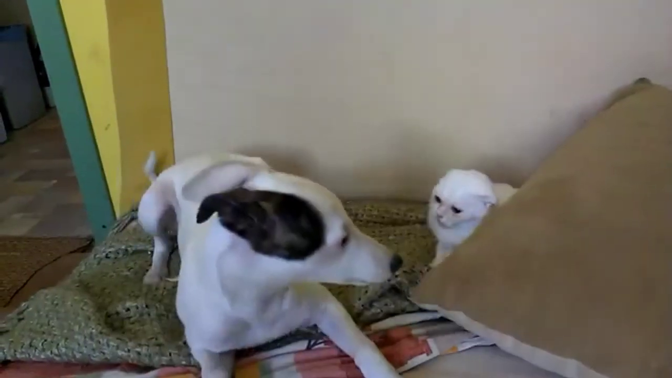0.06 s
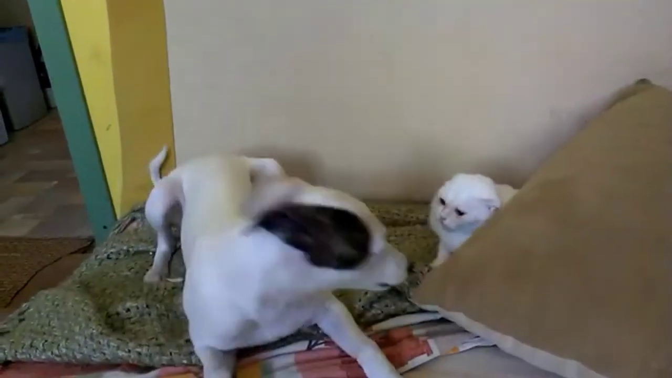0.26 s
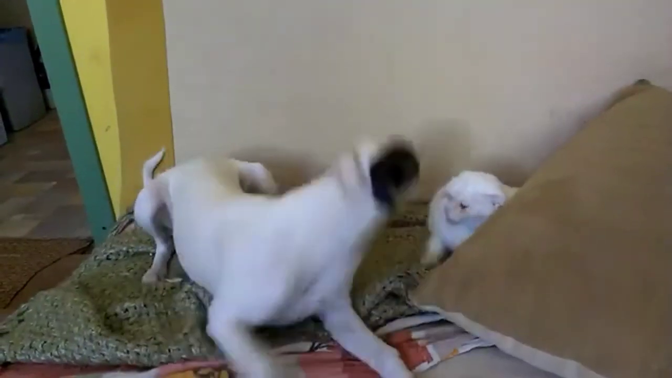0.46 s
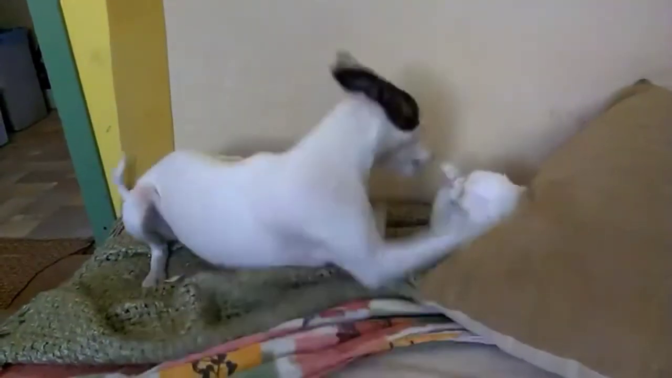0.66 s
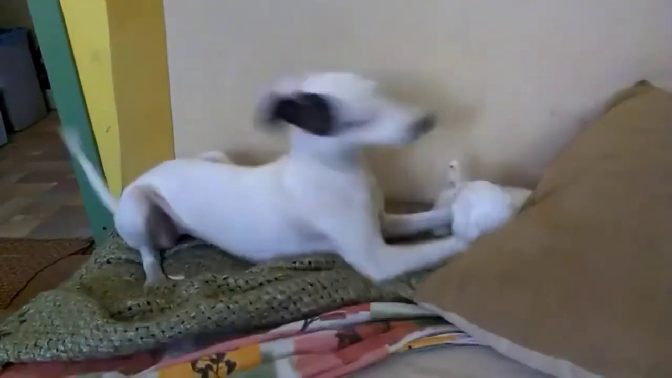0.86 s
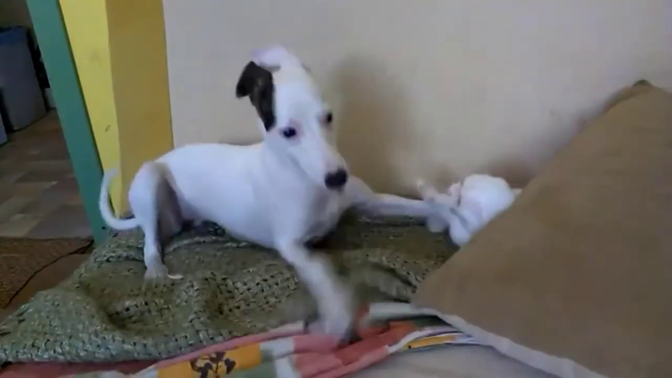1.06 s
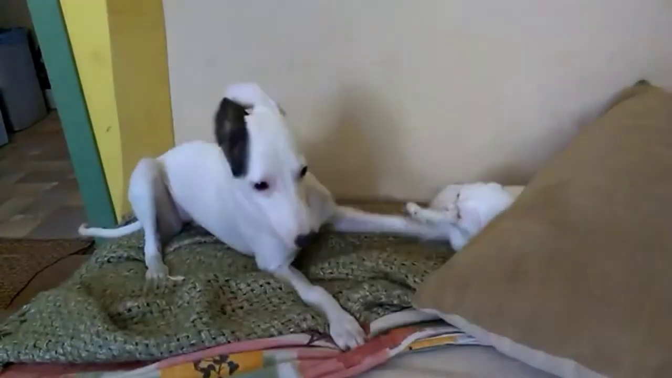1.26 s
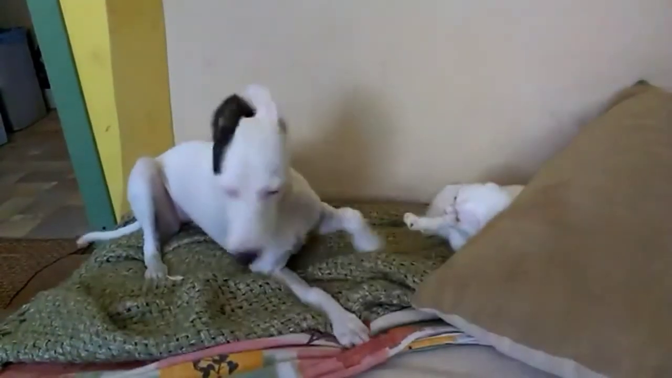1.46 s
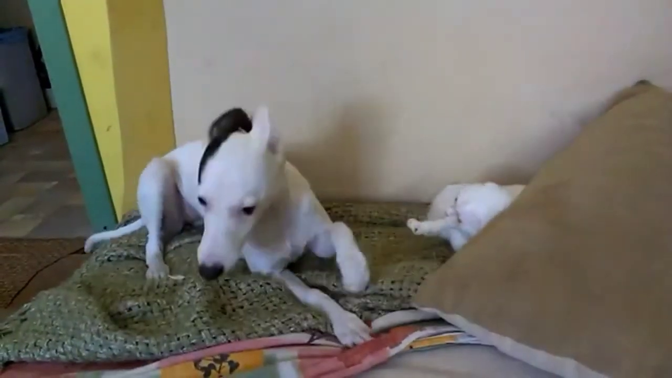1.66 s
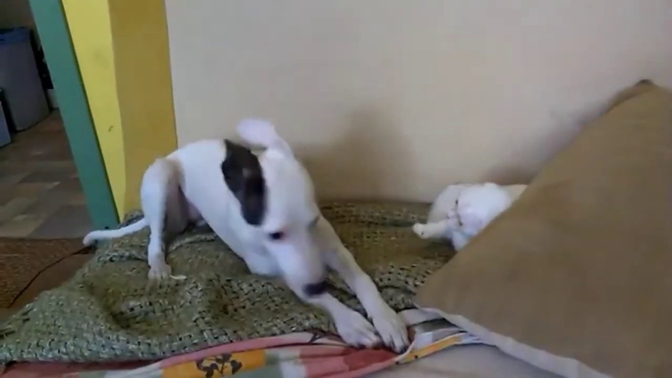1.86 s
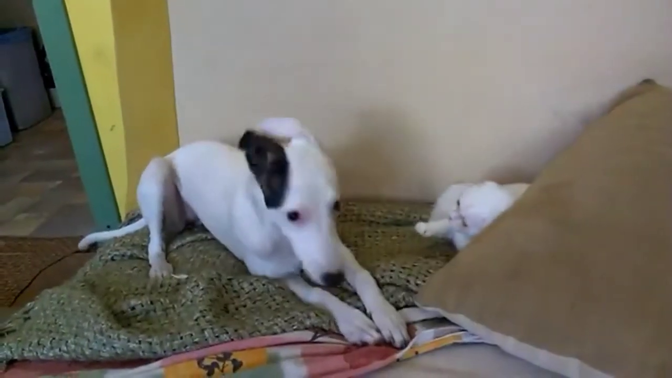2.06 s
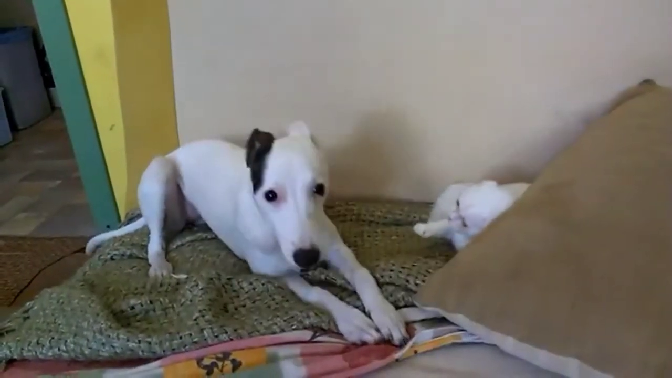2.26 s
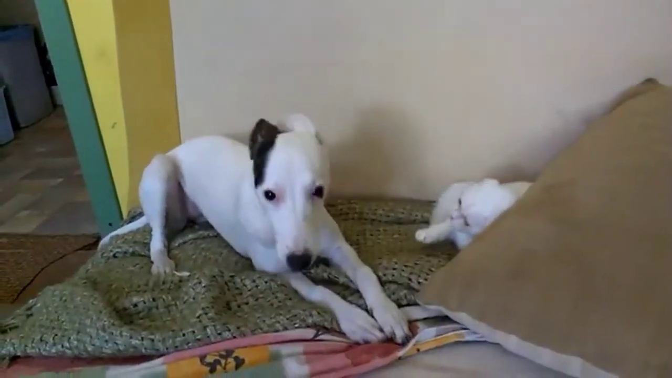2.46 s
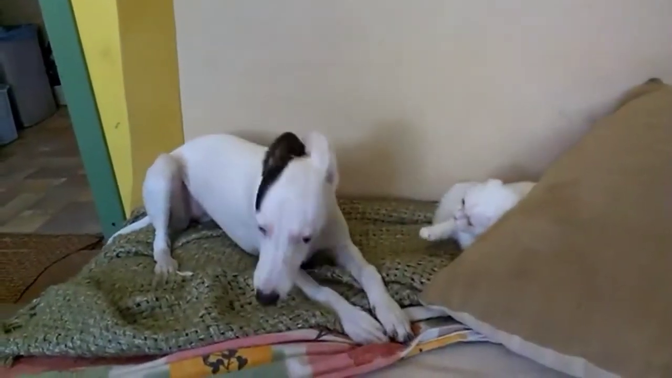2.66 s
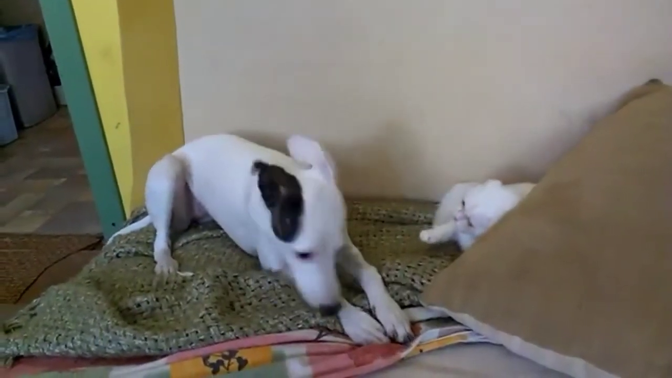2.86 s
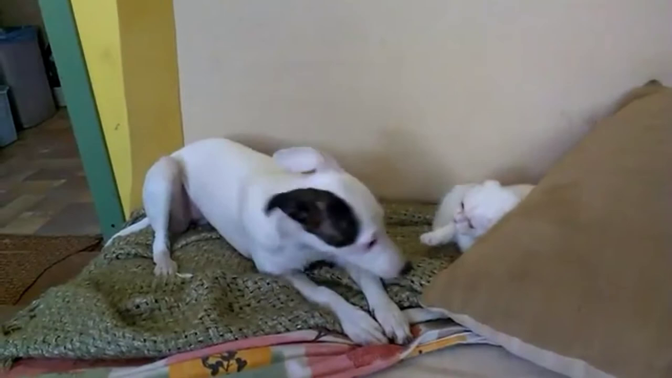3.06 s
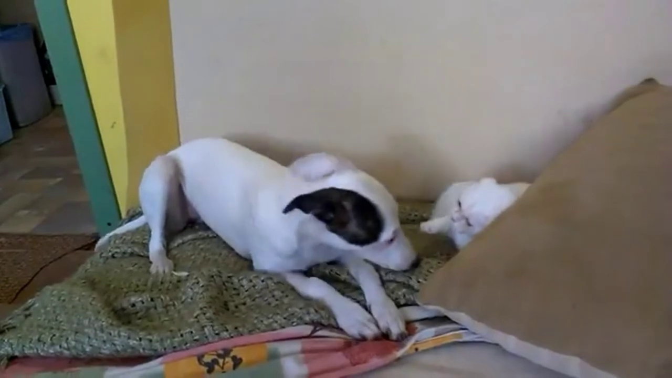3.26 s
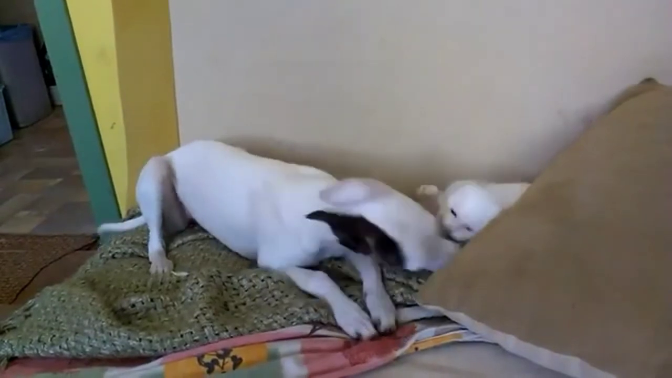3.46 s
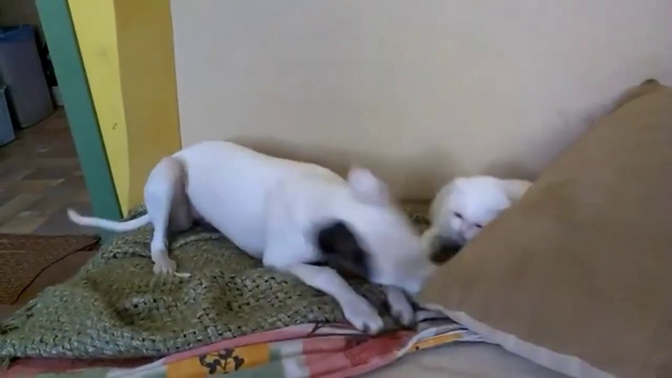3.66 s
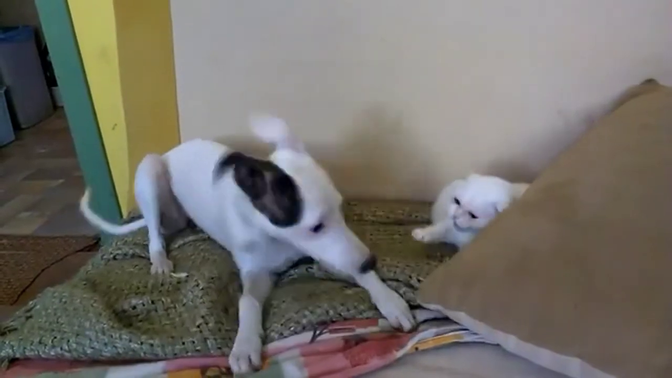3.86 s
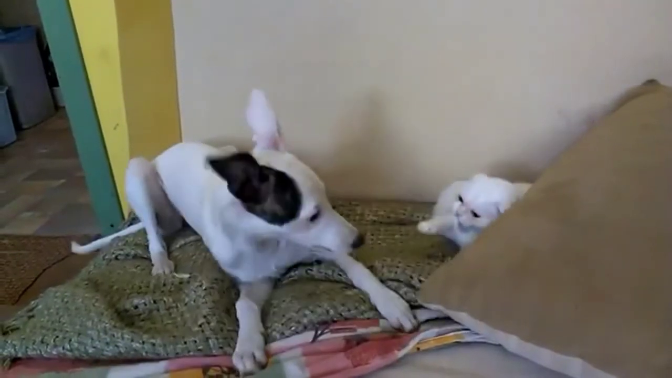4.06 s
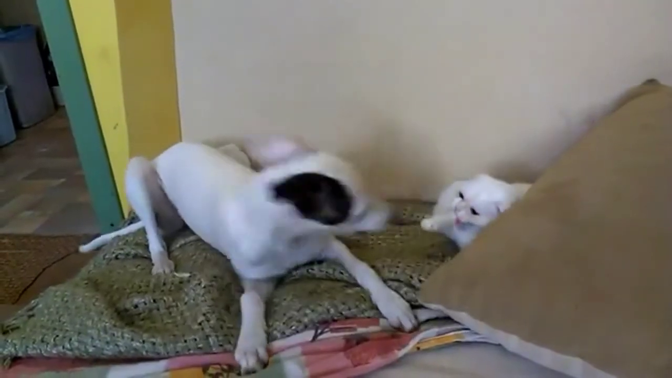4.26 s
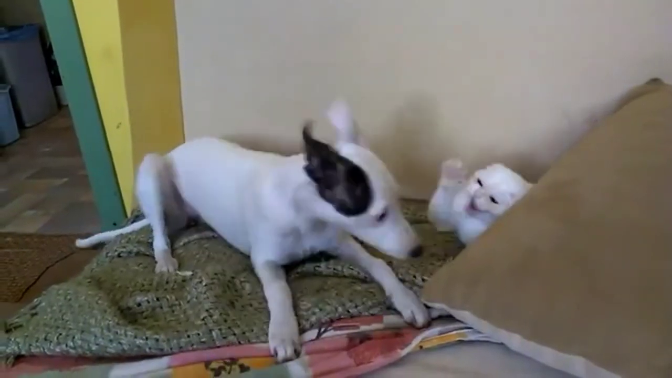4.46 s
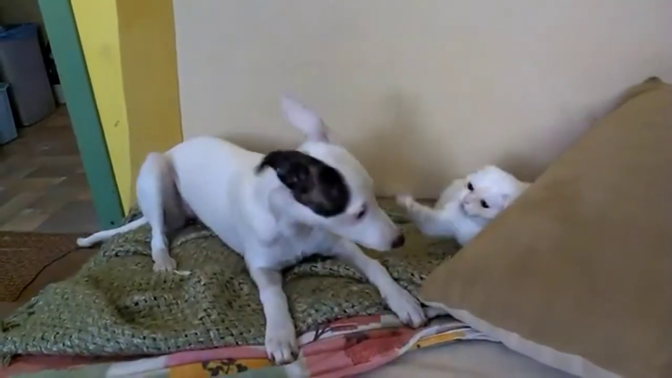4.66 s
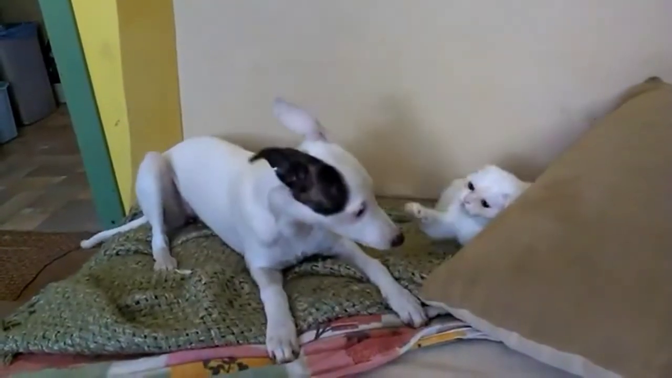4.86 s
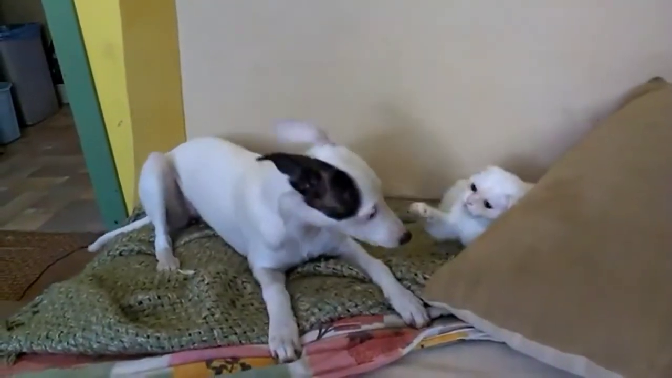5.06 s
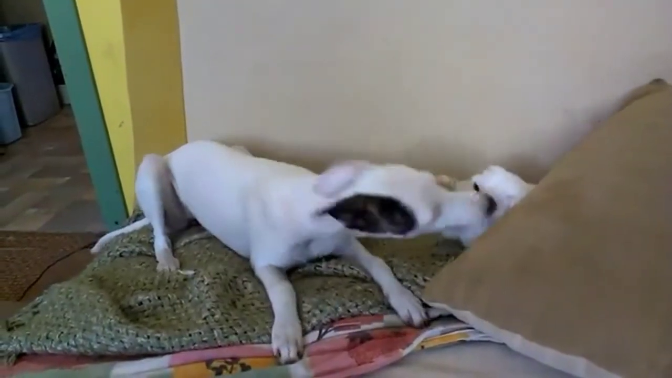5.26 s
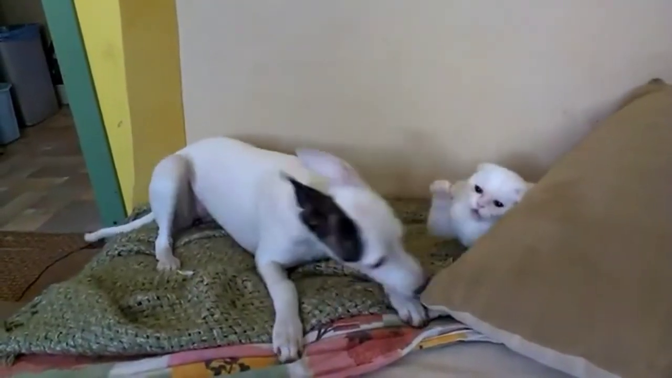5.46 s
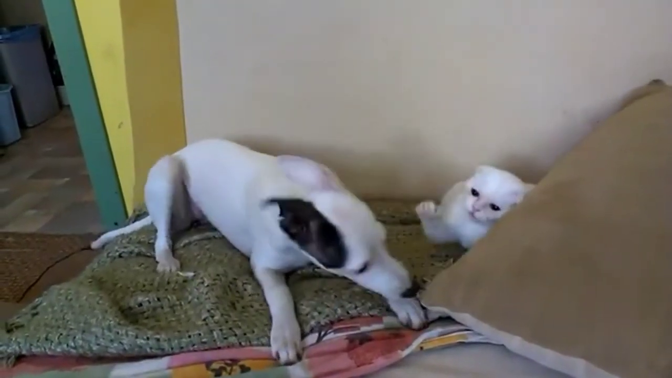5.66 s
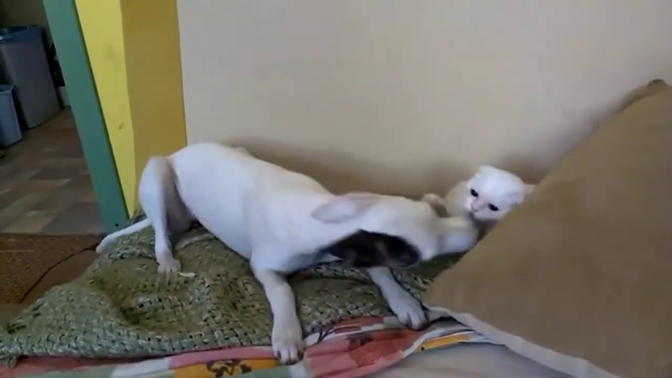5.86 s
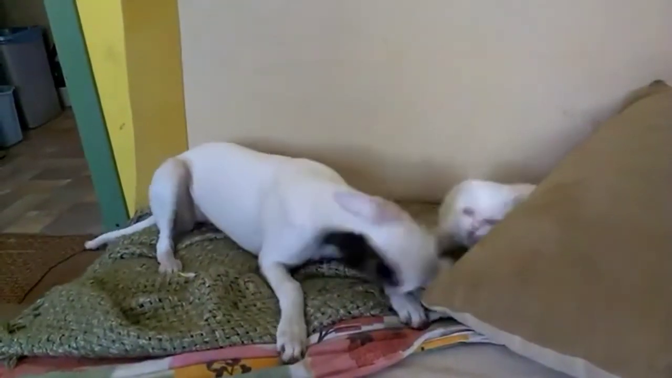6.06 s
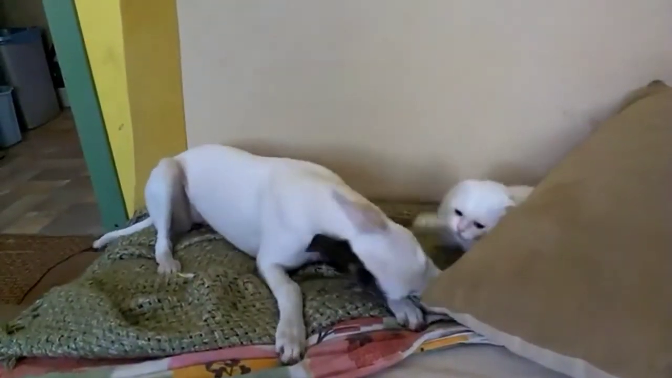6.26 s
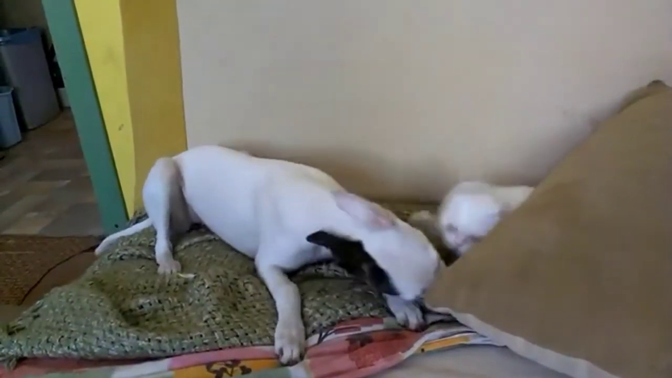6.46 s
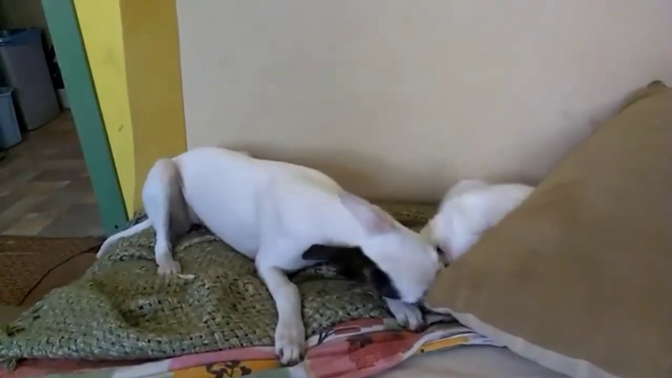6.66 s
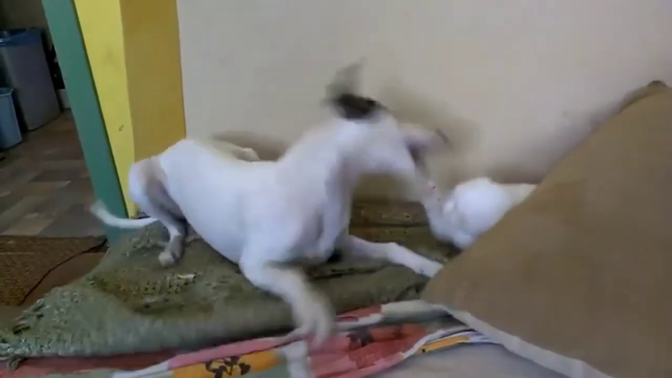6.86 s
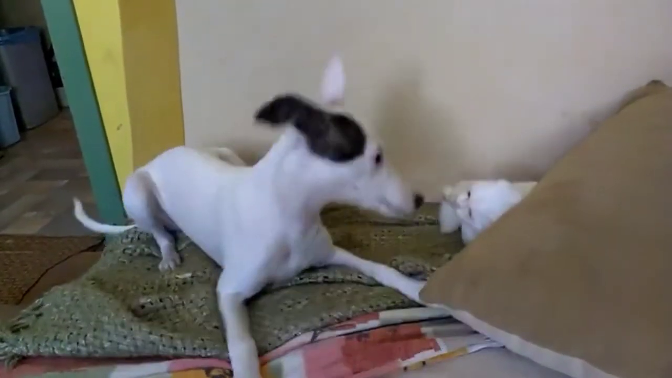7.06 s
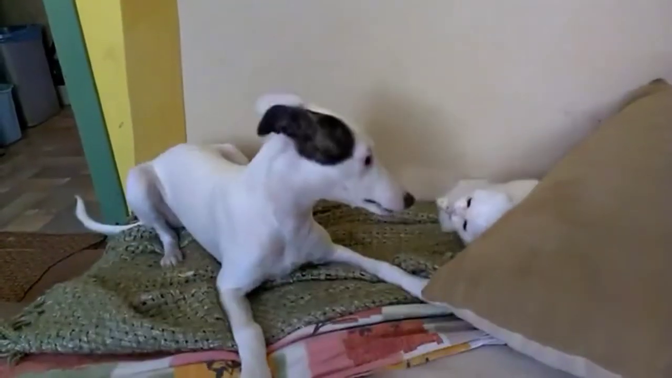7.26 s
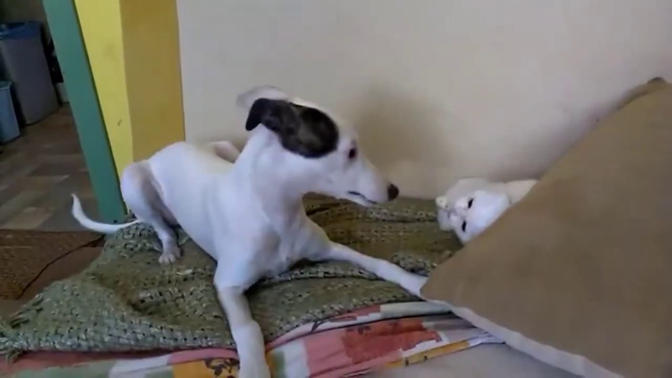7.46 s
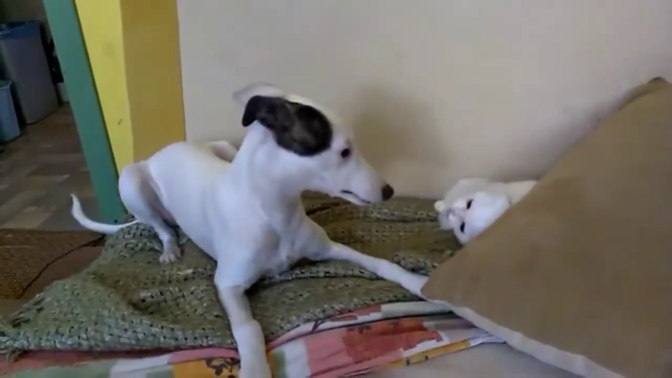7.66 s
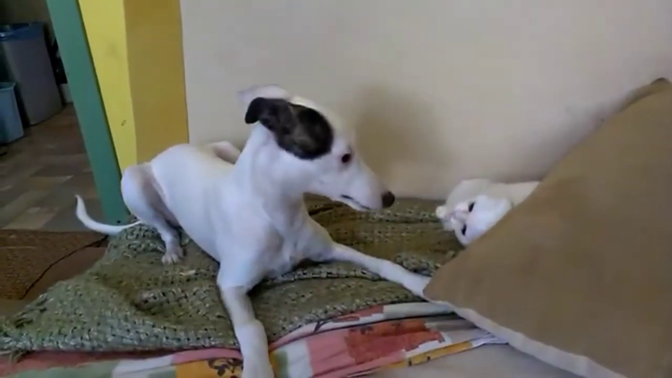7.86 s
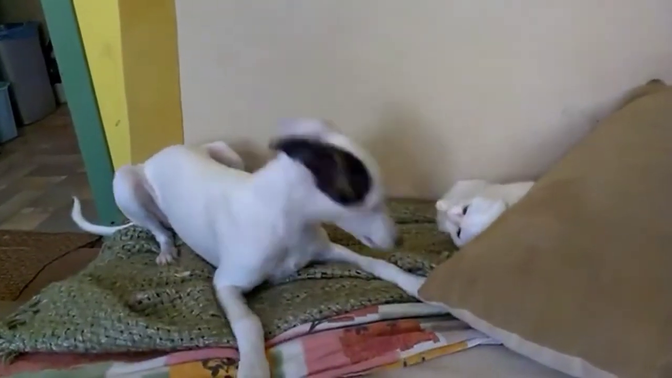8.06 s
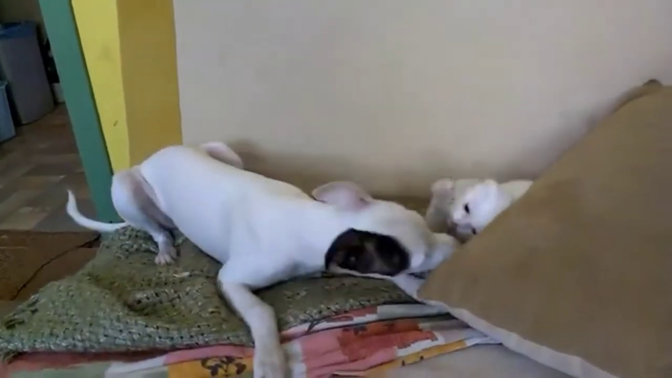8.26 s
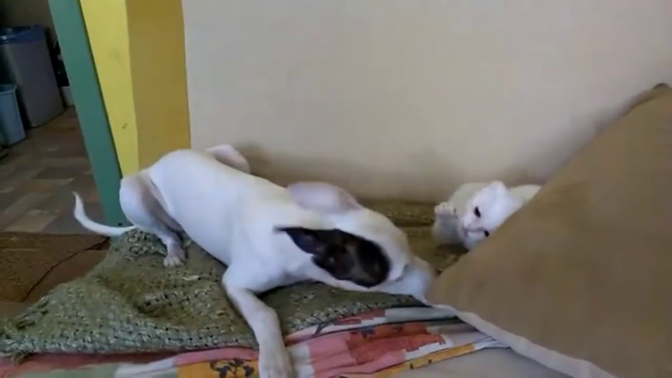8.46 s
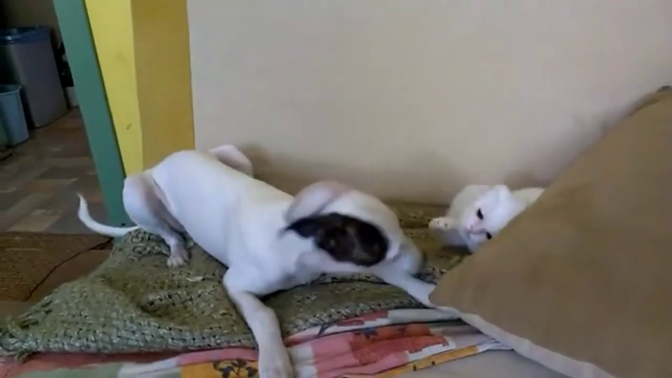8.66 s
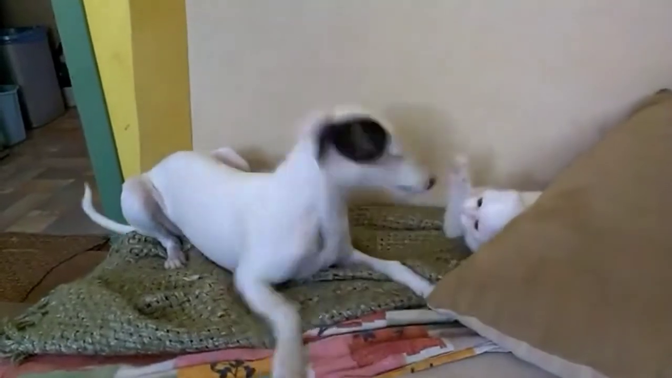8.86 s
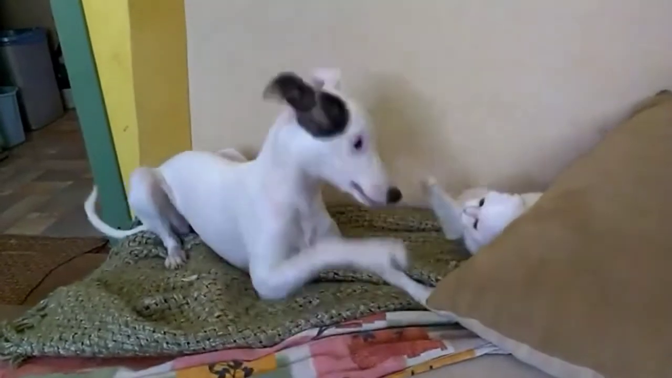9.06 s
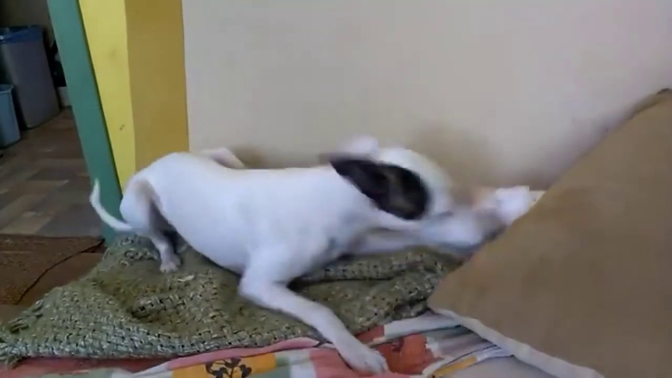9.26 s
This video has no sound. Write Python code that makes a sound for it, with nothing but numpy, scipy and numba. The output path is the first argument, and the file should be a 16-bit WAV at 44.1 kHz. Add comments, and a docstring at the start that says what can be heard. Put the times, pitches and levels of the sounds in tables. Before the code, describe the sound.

Close to the microphone in a small room, a kitten wards off a dog with repeated bursts of rough growling. The first two growls open into yowls, followed by a breathy hiss. Then a stuttering snarl climbs into several sharp spits and a falling cry, and one more growl follows. The dog is heard through soft paw thumps, rustling bedding and light clicks of claws and lips.

```python
"""A kitten's rattling growl opens into yowls, a hiss and a spitting screech as it wards off a playful dog.
Its vocal folds rattle when slack and run clean when taut, ringing chest and mouth; forced air makes the
hiss and screech, the tensed throat thin squeaks. The dog's paws thump on the bedding, the cloth rustles,
claws and lips tick. One microphone, close to the blanket where the kitten is cornered in a small
plastered room, with a wall just behind the animals."""
import sys
import numpy as np
from scipy import signal
from scipy.fft import rfft, irfft
from scipy.io import wavfile
from scipy.ndimage import uniform_filter1d
from numba import njit

SR = 44100
rng = np.random.default_rng(int(sys.argv[2]) if len(sys.argv) > 2 else 0)


def bounce(signal):
    """Save signal as a 16-bit WAV file at the path given by the first command-line argument."""
    frames = np.transpose(np.atleast_2d(signal))
    limited = np.clip(frames, -1, 1)
    pcm = np.round(limited * 32767).astype(np.int16)
    wavfile.write(sys.argv[1], SR, pcm)


N = 411012
TIME = np.arange(N) / SR

# the kitten's voice, one curve a phrase: (time [s], pitch [Hz], mouth opening [0-1], effort [dB])
VOICE_PHRASES = [
    [(0, 142, 0.32, -47), (.45, 144.3, 0.38, -52), (.76, 157.6, 0.5, -50), (.86, 315.5, 0.75, -49),
     (.915, 352, 0.84, -53.5), (.935, 456.6, 0.88, -51), (1.08, 560, 0.96, -55), (1.17, 470.7, 0.86, -51),
     (1.22, 318.7, 0.83, -43.5), (1.28, 164.9, .68, -49), (1.38, 143.1, 0.48, -45.5),
     (1.62, 137.8, 0.03, -50.5)],
    [(2.68, 112.2, 0.05, -57), (3.2, 115.5, 0.02, -53), (3.4, 140.2, 0.08, -53), (3.44, 220, 0.03, -44),
     (3.5, 259.2, 0.03, -48.5), (3.58, 301, 0.05, -51.5)],
    [(3.707, 236.8, 0.63, -45), (3.75, 302.1, .88, -48.5), (3.8, 406.4, 0.84, -47.5),
     (3.83, 360.5, 1, -46.5), (3.853, 279.4, 0.75, -43.5), (3.872, 206.1, 0.67, -49.5)],
    [(5.64, 118.2, 0.02, -58.5), (5.95, 135.9, 0.07, -50.5), (6.03, 173.9, 0.59, -52.5),
     (6.24, 239, 0.5, -50.5), (6.5, 187.6, 0.66, -50), (6.64, 269.8, 0.77, -52), (6.73, 349.8, 0.84, -50),
     (6.765, 445.7, .94, -51.5), (6.865, 329.8, 0.71, -41.5), (6.93, 444.4, 0.96, -43),
     (6.975, 295.2, 0.66, -44.5)],
    [(7.305, 431, 0.66, -47.5), (7.46, 377.5, 0.56, -45.5), (7.63, 287, .58, -53.5)],
    [(8.338, 169.4, 0.54, -49), (8.55, 165.4, 0.55, -54.5), (8.78, 161.3, 0.13, -52),
     (8.88, 161.2, .56, -51), (9.0, 195, 0.69, -50), (9.12, 162.4, 0.54, -51.5), (9.32, 160.4, 0.06, -51.5)],
]
# widths of the mouth's resonances: (first [Hz], second [Hz], third [Hz], top [Hz])
FORMANT_WIDTHS = [344, 680, 811, 1260]
# air forced through the tight throat:
# (time [s], length [s], level [dB], resonance at start [Hz], at end [Hz], release [s])
THROAT_SPITS = [(6.958, .025, -23, 4894, 5600, 0.267), (7.104, .065, -23.5, 5800, 4100, .25),
                (7.263, 0.074, -27.5, 4950, 3843, 0.304), (7.372, 0.063, -24, 5864, 5370, 0.486)]


def voice(throat_air_db=-5, nose_hz=5700, push_throat_share=0.26):
    """Growls stay in the chest; as the mouth opens the upper resonances rise and take over."""
    # the mouth from shut to wide: (opening [0-1], first, second, third and top resonance [Hz],
    # first over chest [dB], third over second [dB], mouth over throat [dB])
    vowels = [(0, 620, 900, 4300, 5600, 1, 19, -26.5), (.2, 712, 1220, 3440, 6200, -6.5, -1, -8),
              (.5, 740, 1880, 4060, 7800, -3.5, 2, 1), (.7, 600, 2600, 4200, 7780, -3.5, -1, 10.5),
              (1, 1500, 2890, 3100, 7600, 2, -7.5, 19.5)]
    # how far the lips are drawn back, one value a phrase: (top resonance [factor])
    lip_factors = [0.85, .85, 0.88, 1.04, .9, 0.975]
    # pushes of breath that swell the open mouth's sound:
    # (time [s], length [s], boost [dB], third resonance [Hz], third over second [dB])
    pushes = [(.96, 0.065, 12.5, 4730, 0.5), (1.08, 0.094, 14.5, 4020, -3.5), (1.125, 0.018, 6, 3550, -1),
              (3.736, 0.055, 7.5, 3780, 1.5), (3.833, 0.021, 4, 3440, -1), (6.14, 0.069, 7.5, 3630, -0.5),
              (6.26, 0.079, 8.5, 4100, -4.5), (6.395, 0.056, 8, 4040, 0), (6.54, .08, 4, 3960, -4),
              (6.699, 0.03, 5.5, 3500, 3), (6.77, 0.049, 7.5, 4374, 5.5), (6.935, 0.019, 15, 4040, 6.5),
              (8.35, 0.031, 1.5, 4070, 3.5)]
    pitch, opening, effort_db = in_time(np.vstack(VOICE_PHRASES))
    openings, *columns = np.transpose(vowels)
    shape = [np.interp(opening, openings, column) for column in columns]
    first_hz, second_hz, third_hz, top_hz, first_db, third_db, open_db = shape
    lips, = in_time([(row[0], factor) for rows, factor in zip(VOICE_PHRASES, lip_factors) for row in rows])
    push_db = 0
    for s, length_s, boost_db, pushed_hz, pushed_db in pushes:
        push_db = push_db + boost_db * bump(s, length_s)
        reshaped = bump(s, 2 * length_s)
        third_hz = third_hz + reshaped * (pushed_hz - third_hz)
        third_db = third_db + reshaped * (pushed_db - third_db)
    throat_db = effort_db + push_throat_share * push_db
    mouth_db = effort_db + open_db + push_db
    closures, puffs = folds(pitch)
    source = closures + puffs
    low = from_db(throat_db) * throat(closures + from_db(throat_air_db) * puffs, opening, first_hz, first_db)
    bright = from_db(mouth_db) * mouth(source, second_hz, third_hz, third_db)
    # the top resonance and a steady nasal one grow more slowly with effort than the others
    top_gain = from_db(-55 + 0.39 * mouth_db) * np.minimum(2 * opening, 1)
    top = top_gain * formant(source, lips * top_hz, FORMANT_WIDTHS[3])
    nose = from_db(-42 + 0.53 * mouth_db) * formant(source, nose_hz, width_hz=1200)
    return voicing() * (low + bright + top + nose)


def folds(pitch, slack_rough=.72, taut_rough=.1, break_hz=228.6, fry_hz=139.2,
          jitter=.06, waver=.014, shimmer=3.0, snap_s=2.6e-5, puff_cycles=.45, air=0.028, rasp=0.39):
    """Sharp closures and the puffs of air after them, uneven when the folds are slack and in a spit."""
    forced = spitting()
    rough = taut_rough + (slack_rough - taut_rough) / (1 + (pitch / break_hz) ** 9)
    rough = np.clip(rough + .4 * forced / forced.max(), 0, 1)
    fry_db = 2 / (1 + (pitch / fry_hz) ** 20)
    pitch = pitch * np.exp(jitter * rough * drift(170) + waver * drift(90))
    # each closure comes a little early or late: low harmonics stay steady, high ones rasp
    phase = np.cumsum(pitch) / SR + (0.005 + .07 * rough) * drift(300)
    cycle = np.abs(np.round(phase)).astype(int)
    shimmer_db = shimmer * np.sqrt(rough) * rng.standard_normal(N // 20)[cycle].clip(-1.6, 1.6)
    doubling_db = (fry_db + 0.95 * drift(25)) * (-1.) ** cycle   # strong and weak cycles alternate
    strength = from_db(shimmer_db + doubling_db)
    closure = np.exp(-.5 * ((phase - cycle) / pitch / snap_s) ** 2)
    puff = np.exp(-(phase % 1) / puff_cycles) * rng.standard_normal(N)
    return strength * closure, strength * (air + rasp * rough) * puff


def throat(source, opening, first_hz, first_db, bass_hz=180, muffle_hz=820, shut_below=0.15):
    """Chest and first resonance, muffled when the mouth is shut; the deepest bass is thin."""
    # chest and pharynx resonances: (centre [Hz], width [Hz], level [dB])
    cavities = [(204.5, 58, -1), (284.3, 103, 4), (499, 310, 2)]
    chest = evened(sum(from_db(db) * formant(source, hz, width) for hz, width, db in cavities))
    sound = chest + from_db(first_db) * formant(source, first_hz, FORMANT_WIDTHS[0])
    sound = signal.sosfilt(signal.butter(4, bass_hz, "high", fs=SR, output="sos"), sound)
    muffled = signal.sosfiltfilt(signal.butter(3, muffle_hz, fs=SR, output="sos"), sound)
    return evened(muffled + np.clip(opening / shut_below, 0, 1) * (sound - muffled))


def mouth(source, second_hz, third_hz, third_db, cutoff_hz=6100):
    """The two strong upper resonances, on broad weak ones that fill the valleys."""
    second = formant(source, second_hz, FORMANT_WIDTHS[1])
    third = from_db(third_db) * formant(source, third_hz, FORMANT_WIDTHS[2])
    cheek = from_db(-19) * formant(source, hz=1350, width_hz=630)
    edge = from_db(-30) * formant(source, hz=4600, width_hz=2200)
    sound = evened(second + third) + cheek + edge
    return signal.sosfilt(signal.butter(6, cutoff_hz, fs=SR, output="sos"), sound)


def voicing(attack_s=0.066, release_s=.12, catch_s=0.032, catch_db=-11.5):
    """Each phrase starts and stops quickly and dips where the snarl catches."""
    # catches in the snarl: (time [s])
    catches = [6.079, 6.195, 6.47, 6.663, 8.39, 8.49]
    spans = [(rows[0][0], rows[-1][0]) for rows in VOICE_PHRASES]
    sounding = sum(envelope(start, end - start, 0, attack_s, release_s) for start, end in spans)
    return sounding * from_db(catch_db * sum(bump(s, catch_s) for s in catches))


def screech(core_db=-3, rush_db=-5, flutter_db=1.0, fizz_db_per_octave=28):
    """A fluttering jet rings one sliding resonance over a broad rush; the higher, the more it fizzes."""
    # the rush of air through the throat: (frequency [Hz], level [dB])
    rush_spectrum = [(1200, -16), (2100, -6.5), (3100, -3.5), (4000, 7), (6200, -9), (7300, -9),
                     (8300, -35.5), (11000, -49), (15500, -65)]
    # the fizz of the tight jet: (frequency [Hz], level [dB])
    fizz_spectrum = [(6000, 0), (10500, -21), (15500, -23.5)]
    slides = []
    for s, length_s, _, start_hz, end_hz, _ in THROAT_SPITS:
        slides += [(s, start_hz), (s + length_s, end_hz)]
    centre_hz, = in_time(slides)
    core = from_db(core_db) * formant(rng.standard_normal(N), centre_hz, width_hz=1200)
    rush = from_db(rush_db) * coloured(rush_spectrum)
    fizz = from_db(-41 + fizz_db_per_octave * np.log2(centre_hz / 5800)) * coloured(fizz_spectrum)
    return spitting() * from_db(flutter_db * drift(600)) * (core + rush + fizz)


def spitting(attack_s=0.066):
    """Strength of the air forced out in the spits."""
    return sum(envelope(s, length_s, db, attack_s, release_s)
               for s, length_s, db, _, _, release_s in THROAT_SPITS)


def hiss(flutter_db=0.2):
    """Unvoiced air through the kitten's open mouth swells, holds and dies away."""
    # the breath: (time [s], length [s], level [dB], rise [s], fall [s])
    swells = [(4.48, 0.12, -45.5, 1.3, 0.41)]
    # air shaped by the open mouth: (frequency [Hz], level [dB])
    air_spectrum = [(400, -17), (1000, -10), (1500, -6.5), (3000, -8), (3900, 2), (5700, -0.5),
                    (6400, -8.5), (8500, -13.5), (12000, -28), (15500, -33)]
    breath = sum(envelope(*swell) for swell in swells)
    return breath * from_db(flutter_db * drift(120)) * coloured(air_spectrum)


def squeaks(waver=.02, flutter_db=3, octave_db=-28, rasp_db=-6, width_share=.13):
    """Unsteady, raspy whistles from the tensed throat, most sliding down, with a weak octave."""
    # thin whistles: (time [s], length [s], level [dB], pitch at start [Hz], at end [Hz])
    whistles = [(0.501, 0.021, -38, 3960, 3920), (.535, 0.028, -45.5, 3300, 2720),
                (.595, 0.091, -48.5, 3380, 2480), (3.441, 0.055, -61, 2680, 2900),
                (3.574, 0.032, -58, 3840, 3600), (4.092, 0.0295, -51, 3699, 3534),
                (4.145, .05, -58.5, 2700, 2400), (4.47, 0.025, -51, 820, 760),
                (5.976, 0.036, -48, 1284, 1310)]
    wobble = np.exp(waver * drift(350))
    out, air = np.zeros(N), rng.standard_normal(N)
    for s, length_s, db, start_hz, end_hz in whistles:
        pitch = np.interp(TIME, [s, s + length_s], [start_hz, end_hz])
        phase = 2 * np.pi * np.cumsum(pitch * wobble) / SR
        tone = np.sin(phase) + from_db(octave_db) * np.sin(2 * phase)
        rasp = from_db(rasp_db) * formant(air, pitch, width_share * start_hz)
        out += envelope(s, length_s, db, rise_s=0.037, fall_s=0.18) * (tone + rasp)
    return out * from_db(flutter_db * drift(300))


def paws(press_s=0.0015, gain_db=-3):
    """The dog's soft blows on padded cloth swell for a moment and die at once."""
    # paws landing: (time [s], level [dB], time to fall 60 dB [s], bass cut [Hz])
    landings = [(0.784, -28.5, 0.1, 90), (0.922, -51, 0.079, 61), (1.867, -46.5, 0.12, 70),
                (3.778, -38, 0.048, 50), (6.14, -41.5, 0.14, 69.17), (6.945, -40.5, 0.12, 26),
                (7.066, -43, 0.16, 52), (7.103, -26.5, 0.082, 20.2), (9.198, -42, 0.13, 68.6),
                (9.304, -48, 0.19, 60)]
    # the thud of the bedding: (frequency [Hz], level [dB])
    bedding_spectrum = [(35, -8), (70, -2.5), (120, 1.5), (220, -1), (420, -7.5), (800, -13), (1400, -13.5)]
    blows, padding = np.zeros(N), evened(coloured(bedding_spectrum))
    for s, db, t60, low_hz in landings:
        age = np.clip(TIME - s, 0, 1)
        thud = signal.sosfilt(signal.butter(2, low_hz, "high", fs=SR, output="sos"), padding)
        blows += (1 - np.exp(-age / press_s)) * from_db(db - 60 * age / t60) * thud
    return from_db(gain_db) * blows


def rustle(gain_db=-3, grain_db=3):
    """The blanket's fibres slip in small clumps."""
    # cloth dragged under the paws: (time [s], length [s], level [dB], rise [s], fall [s])
    drags = [(0.593, 0.55, -47.5, .05, .05), (1.66, 0.32, -63, 0.07, 1.9), (3.632, 0.028, -54.5, 1, 0.072),
             (3.961, .01, -55, 0.043, 0.51), (5.459, 0.076, -55, 0.31, 0.47),
             (8.258, 0.012, -50.5, .3, 0.18)]
    # rubbing cloth: (frequency [Hz], level [dB])
    cloth_spectrum = [(250, 2.5), (700, -9.5), (1600, -8.5), (4000, 5.5), (5600, 1), (8000, -23),
                      (14000, -37.5)]
    dragging = sum(envelope(*drag) for drag in drags)
    return dragging * from_db(gain_db + grain_db * drift(400)) * coloured(cloth_spectrum)


def ticks(width_hz=2400.0, cutoff_hz=7000, t60_s=.02):
    """Claws catch and lips smack: tiny cracks, each in one broad resonance."""
    # claw and lip noises: (time [s], level [dB], centre [Hz])
    cracks = [(0.6941, -30, 5040), (0.819, -28.5, 4100), (1.8716, -53, 4320), (1.941, -48.5, 3560),
              (2.77, -57, 4940), (2.8616, -46.5, 5130), (2.944, -46, 4450), (3.04, -56, 4867),
              (5.374, -46.5, 3980), (5.9793, -34.5, 3895), (6.147, -44, 2260), (8.1887, -49, 5000)]
    out, age = np.zeros(N), np.arange(2000) / SR
    for s, db, hz in cracks:
        centre = np.full(len(age), float(hz))
        burst = rng.standard_normal(len(age)) * from_db(-60 * age / t60_s)
        crack = resonate(resonate(burst, centre, width_hz), centre, width_hz)
        at = int(s * SR)
        out[at:at + len(age)] += 2 * from_db(db) * crack / np.abs(crack).max()
    return signal.sosfilt(signal.butter(3, cutoff_hz, fs=SR, output="sos"), out)


def room(x, wall_s=0.001705, wall_db=-18, gap_s=0.0039, tail_db=-2.5, t60_s=0.32):
    """Direct sound reaches the microphone first, then the wall behind the animals, then a diffuse tail."""
    age = np.arange(int(.7 * SR)) / SR
    tail = rng.standard_normal(len(age)) * from_db(-60 * age / t60_s) * (age > gap_s)
    response = from_db(tail_db) * tail / np.linalg.norm(tail)
    response[0] += 1
    response[int(wall_s * SR)] += from_db(wall_db)
    return signal.fftconvolve(x, response / np.linalg.norm(response))[:N]


def room_tone(level_db=-64.5):
    """A faint, steady, dull rush behind the animals."""
    # the background at the microphone: (frequency [Hz], level [dB])
    floor_spectrum = [(25, -11), (40, -12.5), (80, -16.5), (130, -13), (260, -10), (500, -10), (1000, -13),
                      (2000, -16.5), (3200, -21), (4800, -20.5), (6300, -26), (8000, -32.5), (15500, -37.5)]
    return from_db(level_db) * coloured(floor_spectrum)


def from_db(db):
    """Decibels to gain."""
    return 10 ** (np.asarray(db) / 20)


def rms_one(x):
    """Scale to unit power."""
    return x / np.sqrt(np.mean(x ** 2) + 1e-20)


def evened(x):
    """Hold the power at one over a few voice cycles."""
    return x / np.sqrt(np.abs(uniform_filter1d(x * x, size=1400)) + 1e-14)


def in_time(rows):
    """Each column of a curve at every sample."""
    s, *columns = np.transpose(rows)
    return [np.interp(TIME, s, column) for column in columns]


def envelope(start_s, length_s, db, rise_s, fall_s):
    """Attack, hold and release as a gain; rise and fall are the times for 60 dB."""
    away = np.maximum(start_s - TIME, 0) / rise_s + np.maximum(TIME - start_s - length_s, 0) / fall_s
    return from_db(db - 60 * np.minimum(away, 2))


def bump(s, length_s):
    """A bell of height one, length_s wide at half height."""
    return .5 ** np.minimum((2 * (TIME - s) / length_s) ** 2, 20)


def drift(rate_hz):
    """A random wander of unit power."""
    knots = rng.standard_normal(N // 20)
    return rms_one(np.interp(TIME * rate_hz, np.arange(len(knots)), knots))


def coloured(spectrum):
    """Noise of unit power with the given spectrum, falling steeply beyond its ends."""
    hz, db = np.transpose(spectrum)
    f = np.arange(N // 2 + 1) * SR / N + 1e-3
    gain = from_db(np.interp(np.log(f), np.log(hz), db))
    skirts = np.minimum(f / hz[0], 1) ** 2 * np.minimum(hz[-1] / f, 1) ** 2
    return rms_one(irfft(rfft(rng.standard_normal(N)) * gain * skirts, N))


@njit
def resonate(x, hz, width):
    """A two-pole resonance with a moving centre and gain one on top."""
    r, y = np.exp(-np.pi * width / SR), np.zeros(len(x))
    for i in range(2, len(x)):
        drive = (1 - r * r) / 2 * (x[i] - x[i - 2])
        y[i] = drive + 2 * r * np.cos(2 * np.pi * hz[i] / SR) * y[i - 1] - r * r * y[i - 2]
    return y


def formant(x, hz, width_hz):
    """A resonance with steep skirts, at even level."""
    centre = hz + np.zeros(N)
    return evened(resonate(resonate(x, centre, float(width_hz)), centre, float(width_hz)))


def scene():
    """Kitten and bedding close to one microphone in the small room, over quiet room tone."""
    kitten = voice() + screech() + hiss() + squeaks()
    bedding = paws() + rustle() + ticks()
    return (room(kitten + bedding) + room_tone())[None]


def record(dry):
    """A small recorder with a steep top cut and a slight offset."""
    cutoff_hz, offset = 15700, .0025
    return signal.sosfilt(signal.ellip(10, .1, 80, cutoff_hz, fs=SR, output="sos"), dry) + offset


dry = scene()
out = record(dry)
bounce(out)
```